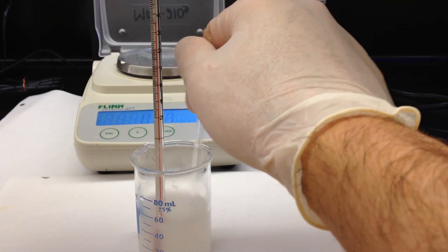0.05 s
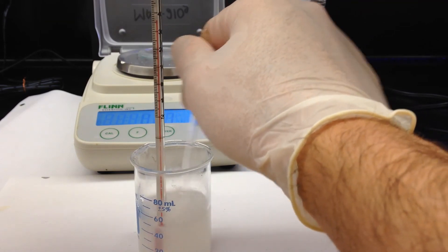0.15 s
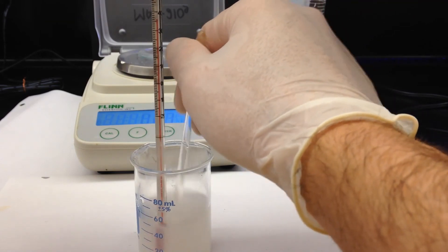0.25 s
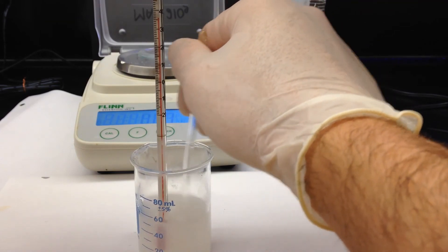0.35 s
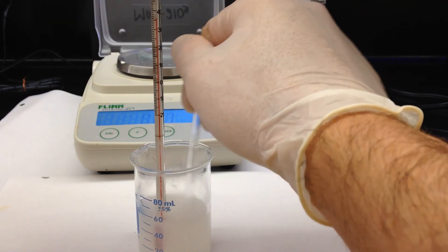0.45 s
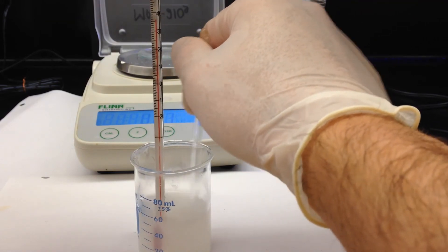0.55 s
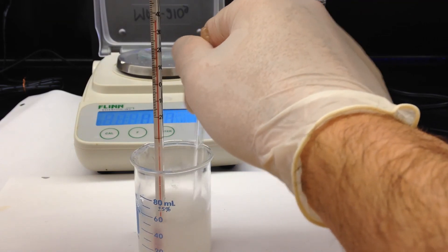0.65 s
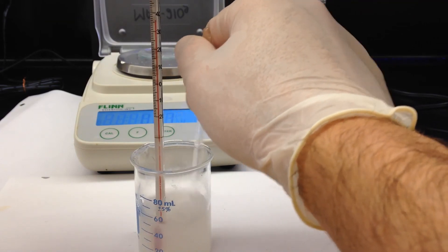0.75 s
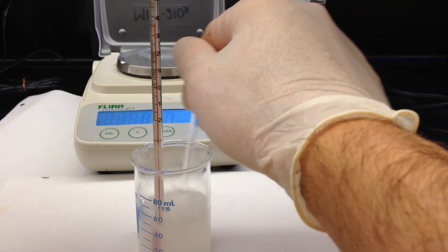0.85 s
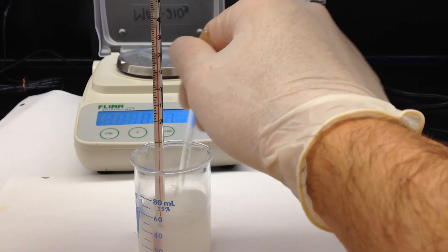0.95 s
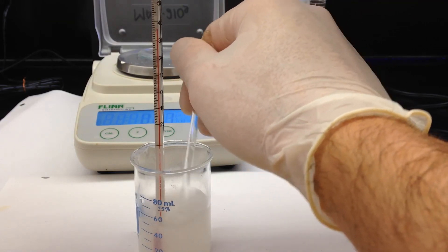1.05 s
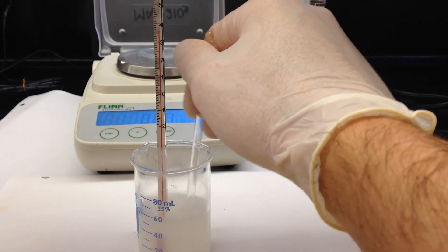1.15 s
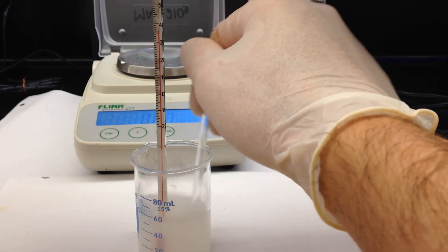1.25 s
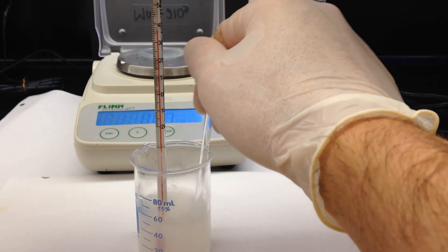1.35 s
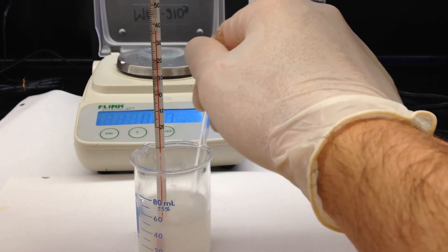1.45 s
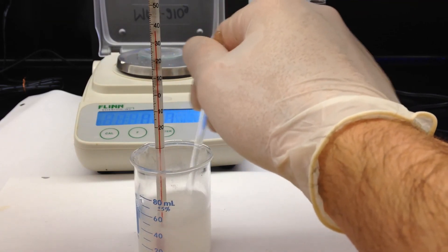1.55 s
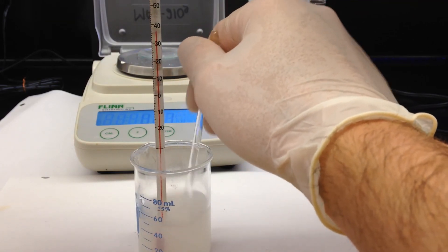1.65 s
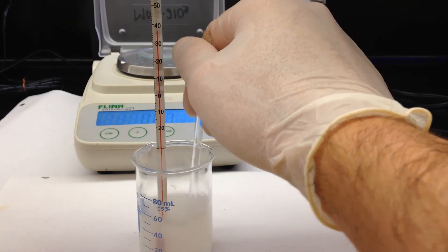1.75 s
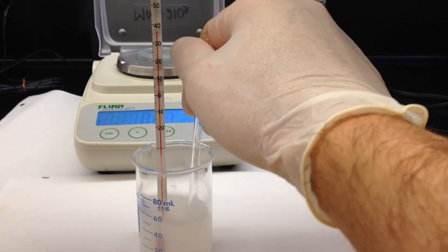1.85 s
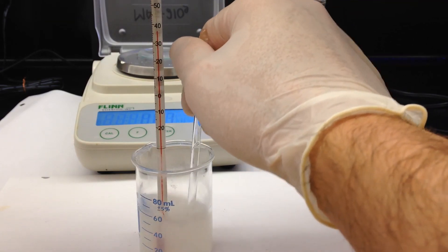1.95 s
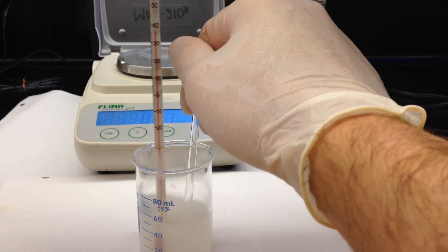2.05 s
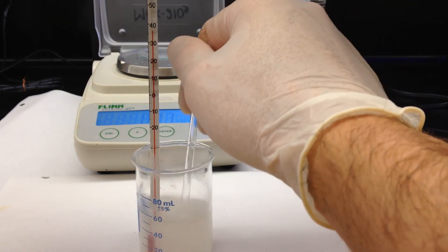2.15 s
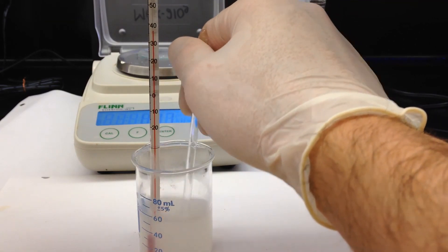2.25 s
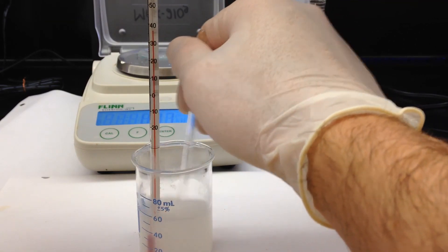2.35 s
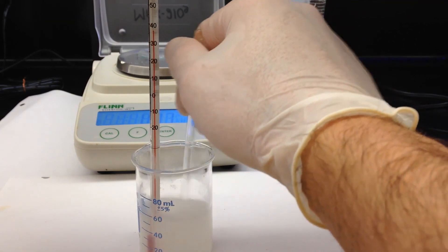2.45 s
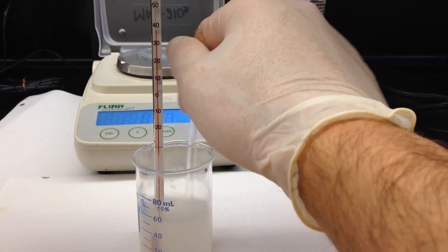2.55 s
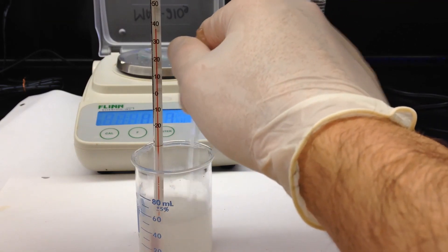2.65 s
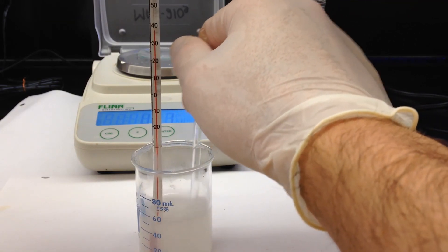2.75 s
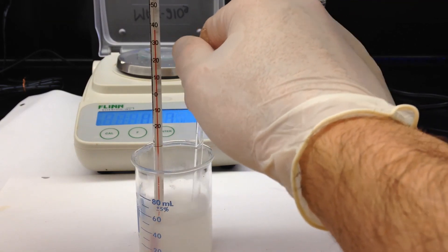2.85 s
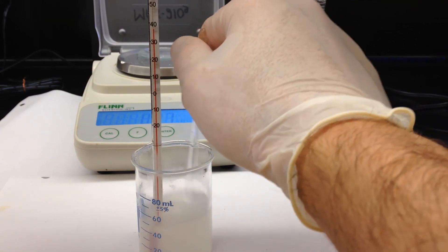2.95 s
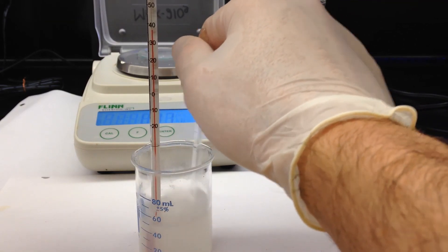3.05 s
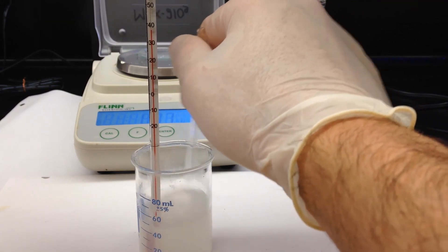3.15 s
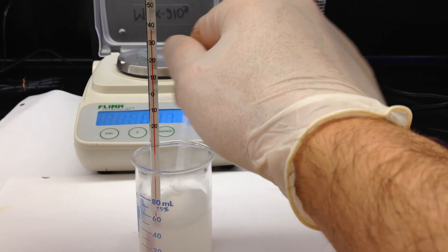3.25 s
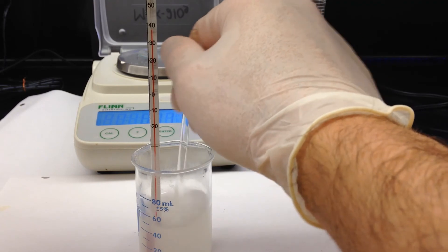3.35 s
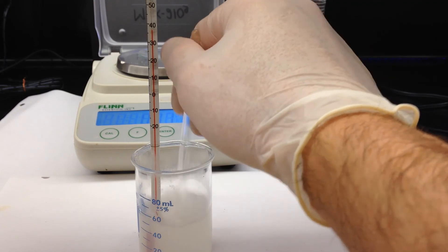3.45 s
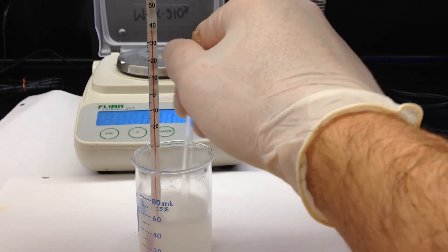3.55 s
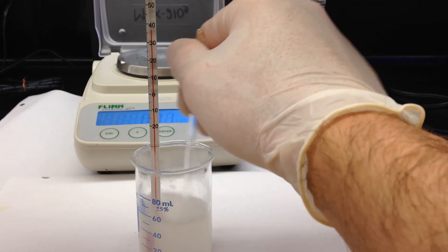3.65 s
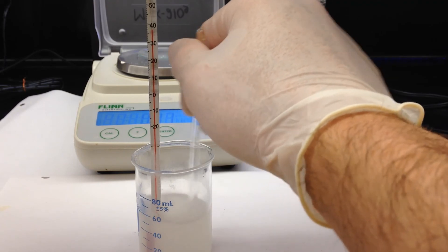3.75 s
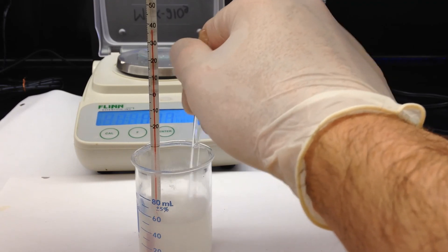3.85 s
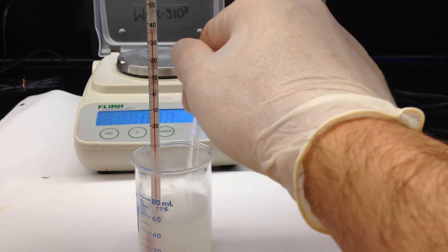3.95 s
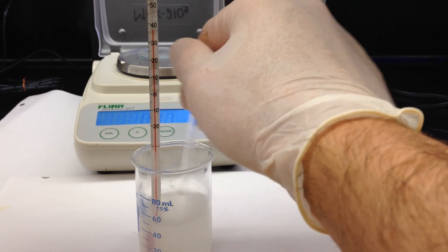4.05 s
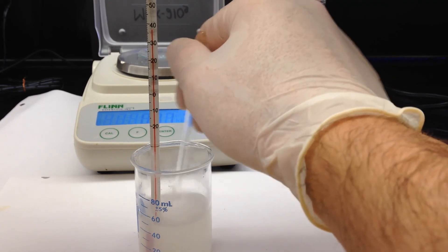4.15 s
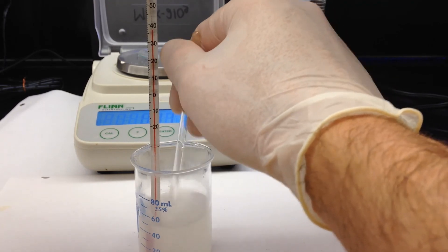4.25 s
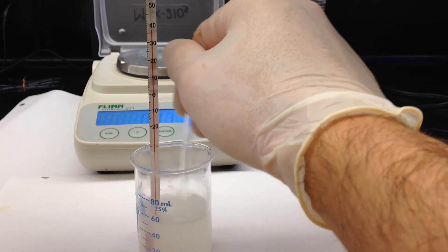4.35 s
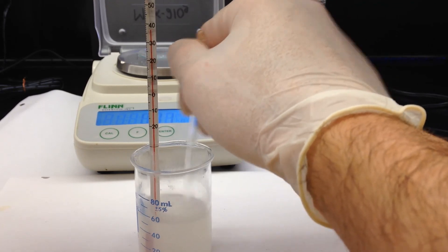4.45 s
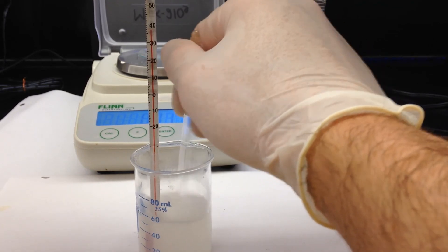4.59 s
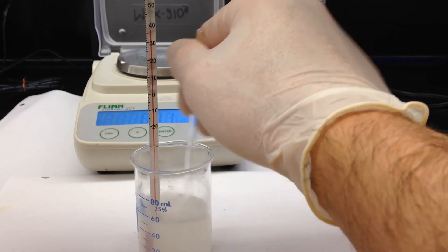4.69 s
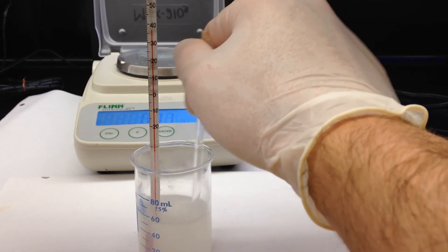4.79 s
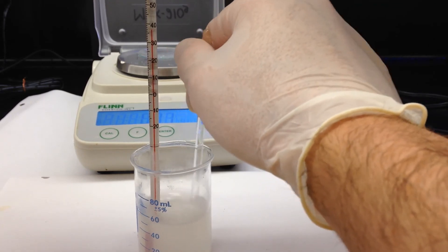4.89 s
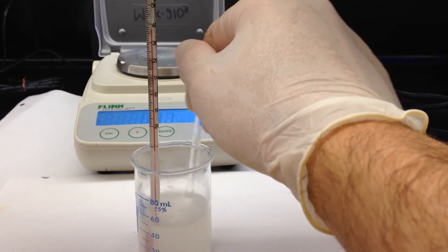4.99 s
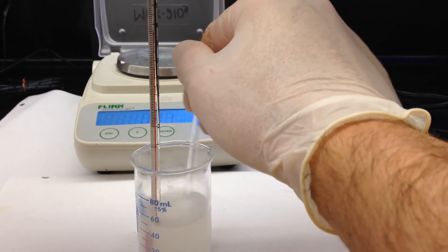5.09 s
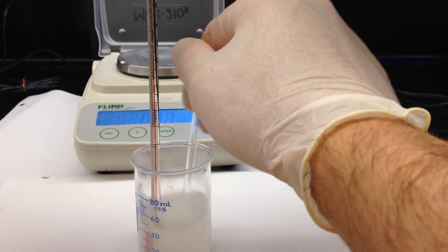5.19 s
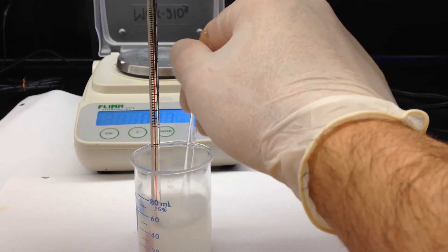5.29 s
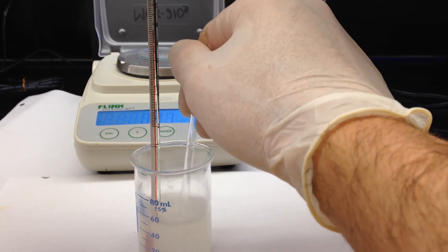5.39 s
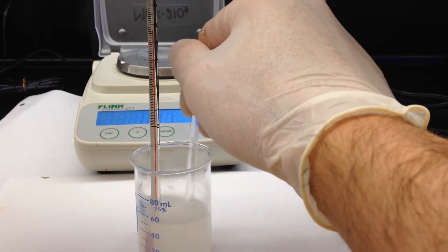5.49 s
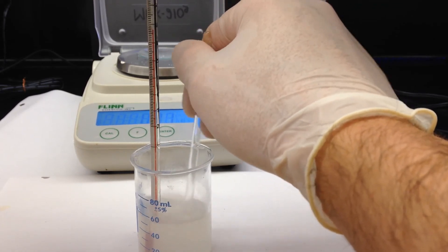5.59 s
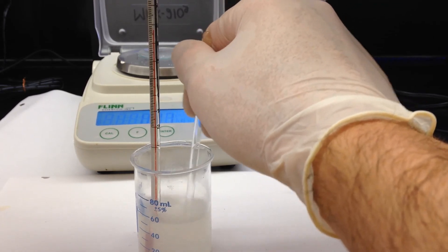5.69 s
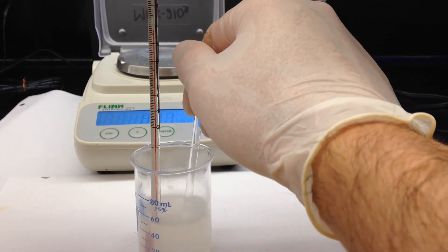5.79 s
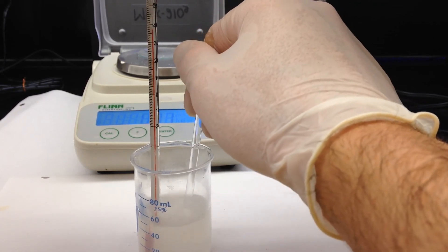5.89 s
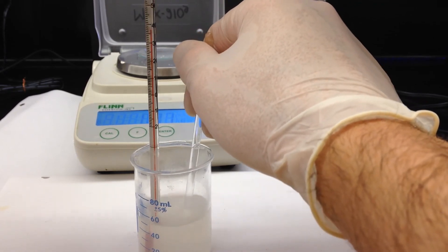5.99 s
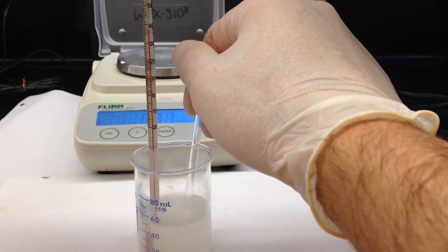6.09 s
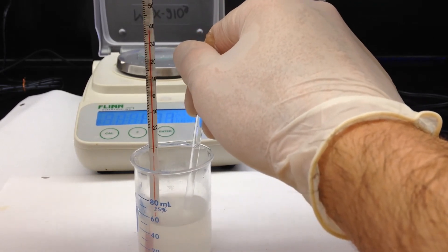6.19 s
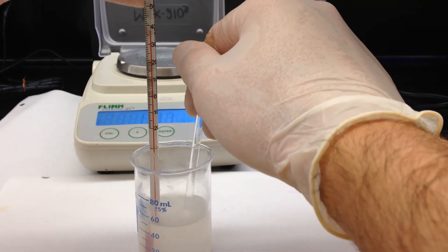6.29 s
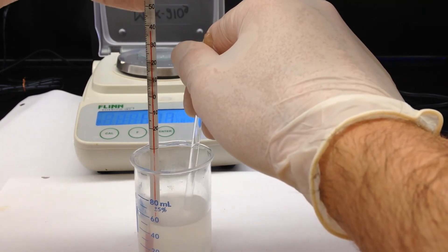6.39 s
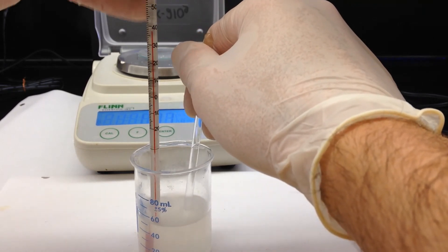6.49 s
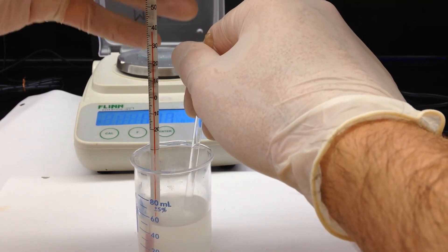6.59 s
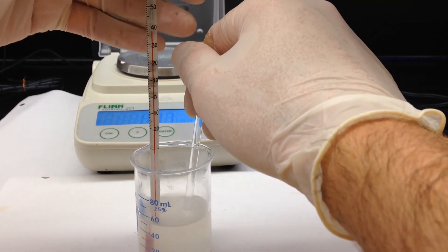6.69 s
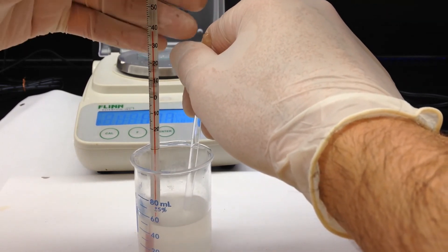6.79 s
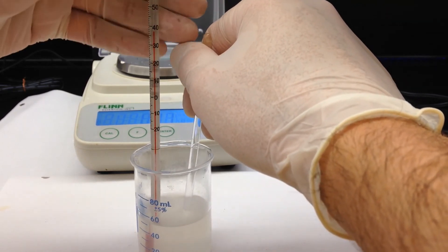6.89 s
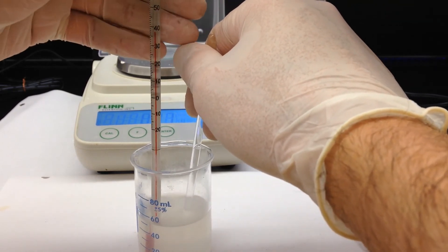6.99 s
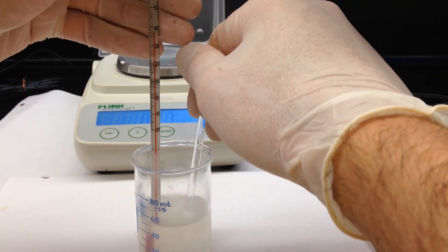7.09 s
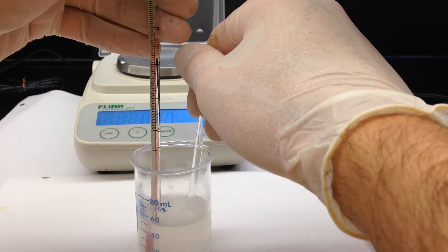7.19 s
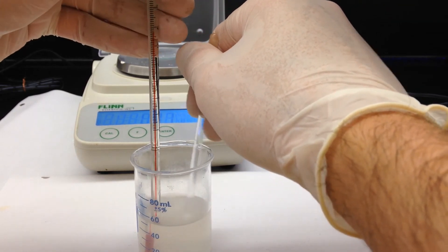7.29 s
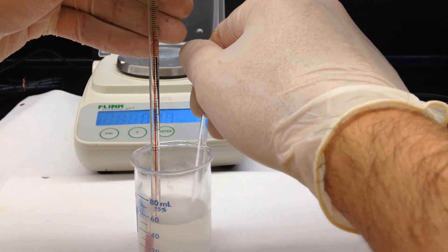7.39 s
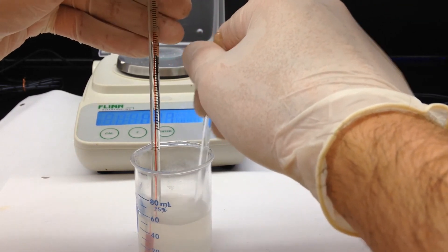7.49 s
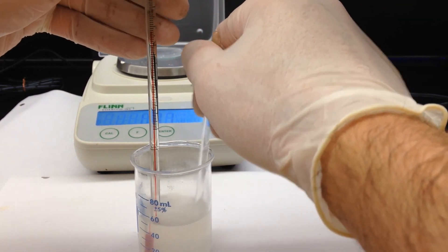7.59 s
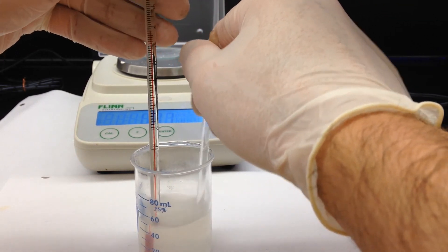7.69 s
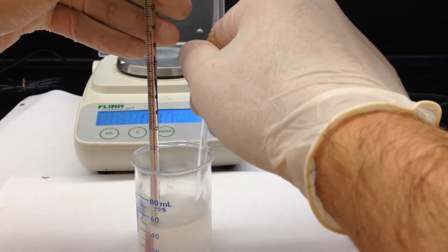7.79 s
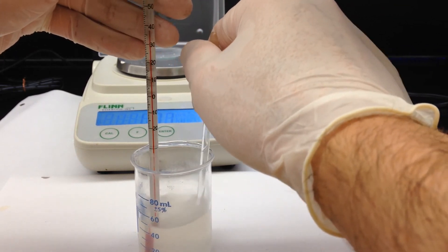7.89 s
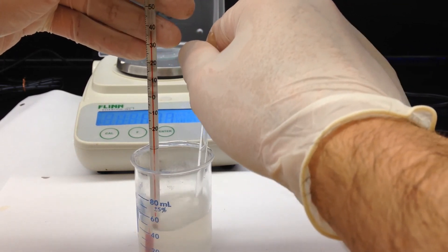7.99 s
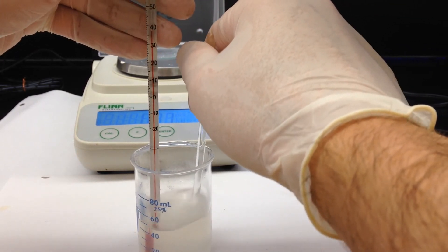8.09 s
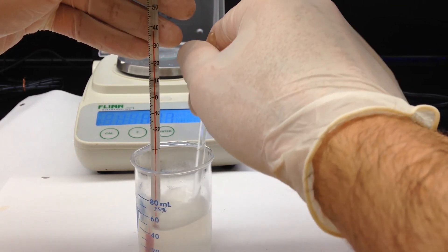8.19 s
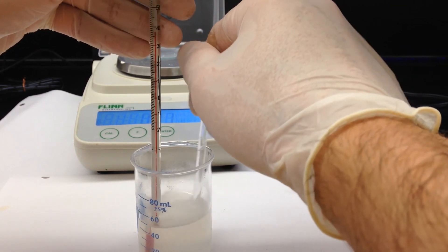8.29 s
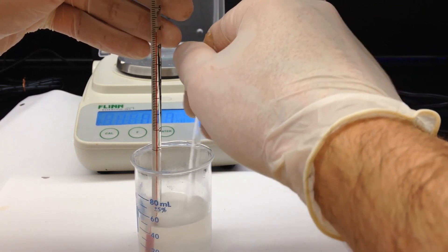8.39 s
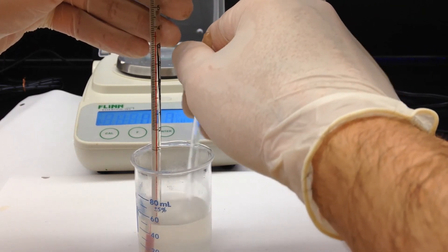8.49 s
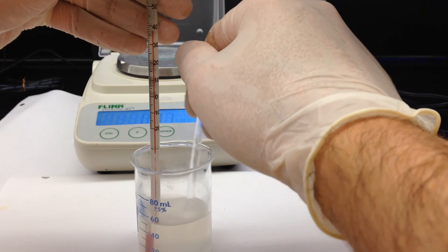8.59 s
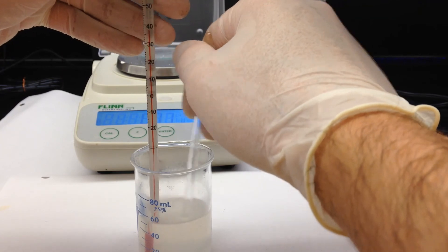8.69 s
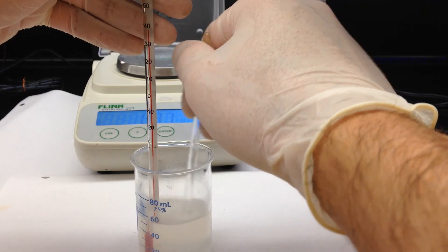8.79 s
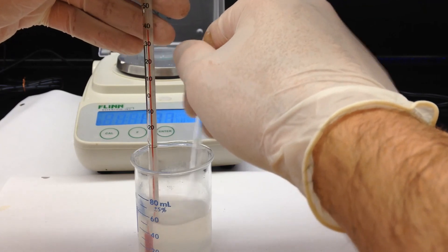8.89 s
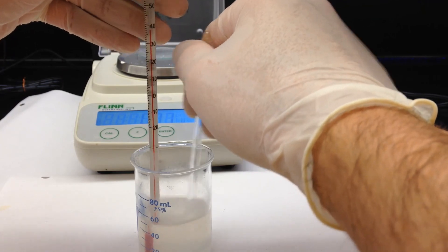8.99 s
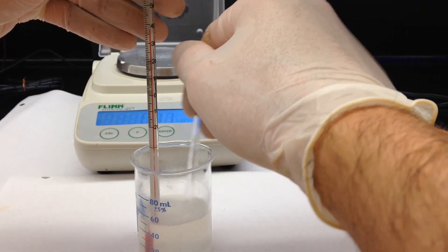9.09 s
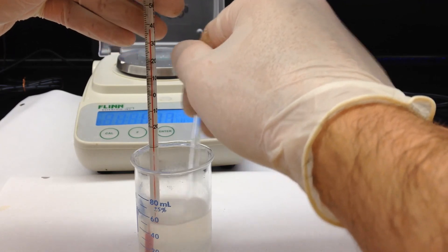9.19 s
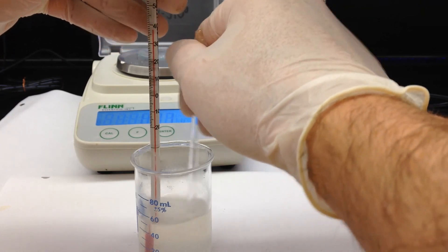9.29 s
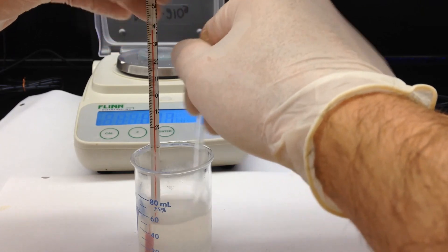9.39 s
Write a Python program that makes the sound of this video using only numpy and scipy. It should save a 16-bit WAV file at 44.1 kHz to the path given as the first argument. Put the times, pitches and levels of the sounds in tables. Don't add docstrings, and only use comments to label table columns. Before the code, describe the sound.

Close microphone in a small lab: a thin glass rod stirs liquid in a beaker, knocking the wall and a glass thermometer in quick, uneven, bright clinks with short wet squeaks. Around six seconds it nearly stops, leaving faint ticks and low ventilation rumble, then resumes at about ten taps per second with light bench thuds.

```python
import sys
import numpy as np
from scipy import signal
from scipy.fft import rfft, irfft, next_fast_len
from scipy.io import wavfile
from scipy.ndimage import uniform_filter1d

SR = 44100
rng = np.random.default_rng(int(sys.argv[2]) if len(sys.argv) > 2 else 0)


def dump(signal):
    limited = np.clip(np.atleast_2d(signal).T, -1, 1)
    pcm = np.round(limited * 32767).astype(np.int16)
    wavfile.write(sys.argv[1], SR, pcm)


def to_linear_factor(level_db):
    exponent = np.asarray(level_db, float) / 20
    return 10 ** exponent


N = 416304
STEADY_TOP_HZ = 15850
HELD_FROM_S = 7.0


def place(seconds, shapes):
    out = np.zeros(N + shapes.shape[1])
    starts = np.round(seconds * SR).astype(int)[:, None]
    np.add.at(out, starts + np.arange(shapes.shape[1]), shapes)
    return out[:N]


def bandpass(x, low_hz, high_hz, order=2):
    return signal.sosfilt(signal.butter(order, [low_hz, high_hz], "band", fs=SR, output="sos"), x)


def strike(seconds, blow_db, modes, scatter_db, detune, rise_s, lean_db=0, scramble=1):
    hz, db, t60 = np.transpose(modes)
    luck = rng.standard_normal((len(seconds), len(modes), 3))
    share = to_linear_factor(db + lean_db + scatter_db * luck[..., 0])
    share = share * np.sqrt(np.sum(to_linear_factor(db) ** 2) / np.sum(share ** 2, axis=1))[:, None]
    t = np.arange(int(t60.max() * SR)) / SR
    shapes = 0
    for k in range(len(modes)):
        turns = hz[k] * (1 + detune * luck[:, k, 1:2]) * t + scramble * luck[:, k, 2:]
        shapes = shapes + share[:, k:k + 1] * to_linear_factor(-60 * t / t60[k]) * np.sin(2 * np.pi * turns)
    return place(seconds, to_linear_factor(blow_db)[:, None] * shapes * (1 - np.exp(-t / rise_s)))


# (start t/s, end t/s, treble level/dB)
DROPOUTS = [(0.127, 0.143, -24), (0.303, 0.309, -16), (0.488, 0.502, -11), (1.643, 1.648, -13),
            (2.021, 2.039, -24), (2.662, 2.681, -28), (2.922, 2.946, -16), (3.341, 3.351, -22),
            (3.439, 3.445, -9), (4.008, 4.016, -8), (4.354, 4.361, -12), (4.709, 4.726, -21),
            (4.824, 4.83, -7), (5.199, 5.212, -12), (5.497, 5.508, -22), (5.747, 5.771, -27),
            (5.819, 5.84, -26), (6.059, 6.07, -13), (6.393, 6.413, -14), (6.609, 6.624, -14),
            (6.759, 6.776, -17), (7.376, 7.416, -24), (7.482, 7.502, -17), (7.979, 7.991, -13),
            (8.61, 8.623, -25), (9.258, 9.267, -11), (9.341, 9.353, -22)]


def treble_dropouts(x):
    t, size = np.arange(N) / SR, next_fast_len(N)
    edges = np.geomspace(1300, 17500, num=24)
    spared = rng.random((len(DROPOUTS), len(edges))) < np.where(edges < 5500, .2, .07)
    spectrum, hz, out = rfft(x, size), np.fft.rfftfreq(size, 1 / SR), x.copy()
    for k, (low, high) in enumerate(zip(edges, edges[1:])):
        band = irfft(spectrum * (hz >= low) * (hz < high), size)[0, :N]
        ringing = to_linear_factor(12) * np.median(np.abs(band[::50]))
        duck_db = np.zeros(N)
        for (start, end, db), stays in zip(DROPOUTS, spared[:, k]):
            near = slice(int((start - .003) * SR), int((end + .003) * SR))
            fade = np.clip(np.minimum(t[near] - start, end - t[near]) / .008 + .35, 0, 1)
            quiet = np.median(np.abs(band[near])) < ringing
            short_and_deep = end - start < .014 and db < -24
            if (quiet and not stays) or short_and_deep:
                duck_db[near] += 1.1 * db * fade
        out += (to_linear_factor(duck_db) - 1) * band
    return out


# (t/s, length t/s, low f/Hz, high f/Hz, level/dB)
SMEARS = [(.318, .026, 5000, 15800, -53), (2.917, .03, 3000, 3350, -56), (2.917, .03, 3950, 4200, -57),
          (2.917, .034, 4500, 4750, -56), (2.917, .03, 8000, 8300, -54), (2.917, .03, 8550, 8800, -55),
          (2.917, .028, 9100, 9350, -56), (2.917, .028, 10600, 10900, -58), (4.326, .03, 8000, 12500, -49),
          (4.348, .026, 6900, 7150, -53), (4.35, .022, 3200, 3450, -53), (4.335, .025, 4600, 4900, -53),
          (5.752, .02, 4300, 5400, -57), (.122, .024, 6900, 7200, -61), (4.35, .022, 2400, 2650, -58)]


def smears():
    out = np.zeros(N)
    for s, length_s, low_hz, high_hz, db in SMEARS:
        noise = bandpass(rng.standard_normal(4096), low_hz, high_hz, order=4)[-int(length_s * SR):]
        fade = np.cos(np.linspace(0, np.pi / 2, len(noise))) ** .7
        out[int(s * SR):][:len(noise)] += to_linear_factor(db) * noise / noise.std() * fade
    return out


# (f/Hz, level/dB per Hz)
AIR = [(20, -43.5), (40, -33), (80, -12.5), (105, -0.5), (230, -6), (478, -2), (505, -9), (800, -12.5),
       (1500, -20.5), (2400, -27), (12500, -32), (15800, -34.5)]
# (f/Hz, rms level/dB, wobble f/Hz)
HUM = [
    (54.2, -78, 1.2),
    (113.5, -71, 8),
    (157, -71, 9),
    (228.8, -67, 15),
    (2136, -88, 2.9),
]


def ventilation():
    hz = np.fft.rfftfreq(N, 1 / SR) + 1e-3
    air_hz, air_db = np.transpose(AIR)
    colour = to_linear_factor(np.interp(np.log(hz), np.log(air_hz), air_db)) * (hz < STEADY_TOP_HZ)
    air = irfft(rfft(rng.standard_normal(N)) * colour, N)
    gusts = uniform_filter1d(rng.standard_normal(N), size=3000) * 55
    out = to_linear_factor(-59.5 + 1.3 * gusts) * air / air.std()
    for tone_hz, db, wobble_hz in HUM:
        tone = irfft(rfft(rng.standard_normal(N)) / (1 + ((hz - tone_hz) / wobble_hz) ** 2), N)
        out = out + to_linear_factor(db) * tone / tone.std()
    return out


def room(x):
    t = np.arange(SR // 2) / SR
    early, late = rng.standard_normal((2, len(t))) * (t > .0015)
    late = signal.sosfilt(signal.butter(1, 5000, fs=SR, output="sos"), late)
    echo = early * to_linear_factor(-24.0 - 60 * t / 0.021) + late * to_linear_factor(-45.5 - 60 * t / 0.36)
    echo = signal.sosfilt(signal.cheby2(10, 50, STEADY_TOP_HZ, fs=SR, output="sos"), echo)
    return signal.fftconvolve(x, echo)[:N]


# (t/s, peak level/dB)
THUDS = [(1.762, -43), (2.211, -44), (7.448, -43), (7.536, -41), (7.769, -45), (5.74, -47), (4.535, -44),
         (8.53, -51), (8.63, -51), (7.95, -50), (9.125, -55), (1.5, -50), (7.645, -48), (8.35, -47)]
# (f/Hz, level/dB, t60 t/s)
THUD_MODES = [(570, -5.5, 0.06), (684, -7.5, 0.042), (810, -3.5, 0.054), (926, -2, 0.037),
              (1040, -14, 0.017), (1280, -9, .03)]


def bench_thuds():
    s, db = np.transpose(THUDS)
    return strike(s, db, THUD_MODES, scatter_db=5.0, detune=0.046, rise_s=0.0028)


# (f/Hz, level/dB, t60 t/s)
BENCH_MODES = [(663, -21.5, 0.017), (873, -26, 0.037), (1126, -42, 0.016), (1308, -21, 0.036),
               (1530, -35.5, 0.021)]


def bench_shake(s, wall_db, rod_db, held):
    db = np.clip(rod_db, wall_db, wall_db + 14.0) + np.where(held, 5.0, -3.0)
    t = np.arange(1024) / SR
    shudder = rng.standard_normal((len(s), len(t))) * (1 - np.exp(-t / 0.002)) * np.exp(-t / 0.012)
    out = place(s, to_linear_factor(db - 18.5)[:, None] * bandpass(shudder, 550, 1500))
    return out + strike(s, db, BENCH_MODES, scatter_db=-0.5, detune=0.038, rise_s=0.0016)


# (t/s, swell t/s, slip rate f/Hz, level/dB of multiple 1, level/dB of multiple 2)
SQUEAKS = [(1.336, 0.0014, 5280, -34, -40), (1.434, .004, 4980, -42.5, -44.5),
           (1.441, .004, 4800, -39.5, -44), (1.45, 0.0039, 5220, -44, -54), (1.677, 0.0057, 4756, -27, -33),
           (1.341, .003, 5500, -41, -59), (4.167, 0.0027, 5030, -35.5, -42),
           (2.837, 0.0037, 5170, -38, -47), (3.82, 0.0053, 5130, -40.5, -62),
           (3.956, 0.01, 5450, -35.5, -39), (4.057, 0.0026, 4980, -36.5, -54),
           (4.171, 0.0085, 5010, -29, -30), (4.302, .004, 5300, -43, -48), (4.361, 0.0045, 4800, -37, -49),
           (4.414, 0.0079, 5220, -33, -40.5), (4.769, 0.0012, 5190, -33, -37),
           (4.879, 0.0039, 5250, -31.5, -40.5), (5.332, .002, 5500, -48, -70),
           (3.853, .002, 5300, -52, -70), (5.769, 0.0031, 4900, -44.5, -83),
           (8.283, 0.003, 5130, -45.5, -54), (8.864, 0.0013, 5160, -36.5, -50),
           (9.172, 0.0033, 5040, -41, -46), (9.268, 0.0078, 5030, -39, -39.5)]


def squeaks():
    s, swell_s, hz, first_db, second_db = np.transpose(SQUEAKS)[..., None]
    t = np.arange(6144) / SR
    after = np.maximum(t - swell_s, 0)
    release = np.exp(-(after / .0024) ** 1.3)
    ring = np.clip(2500 * swell_s ** 2, .08, .25) * np.exp(-after / (.004 + 1.2 * swell_s))
    tail = 5.5 * swell_s * np.exp(-after / 0.045)
    grip = np.minimum(t / swell_s, 1) ** .55 * (release + ring + tail)
    uneven = uniform_filter1d(rng.standard_normal((len(s), len(t))), size=260) * 16
    uneven = uniform_filter1d(uneven, size=120)
    grit = uniform_filter1d(rng.standard_normal(uneven.shape), size=40) * 6.3
    grit = grit * np.clip(after / .003, .6, 1) * np.exp(-after / 0.0144)
    glide = np.tanh((t - swell_s) / 0.009)
    pitch_hz = hz * (1 + 0.019 * grit + 0.0045 * uneven + 0.012 * glide)
    turns = 2 * np.pi * np.cumsum(pitch_hz, axis=1) / SR
    tones = 0
    for k, db in enumerate((first_db, second_db, second_db - 18)):
        tones = tones + to_linear_factor(db) * grip ** (1 + .15 * k) * np.sin((k + 1) * turns)
    scrape = bandpass(rng.standard_normal(uneven.shape), 4200, 5900)
    tones = tones + to_linear_factor(first_db - 12.0) * grip ** 0.8 * scrape
    return place(s[:, 0], tones * (1 + .2 * np.roll(uneven, 1, axis=0)))


# (f/Hz, level/dB, t60 t/s)
RING_MODES = [(4440, 0, 0.06), (4575, -0.5, 0.094)]
HELD_RING_MODES = [(4615, 0, .07), (4495, -4, .06)]


def thermometer(s, ring_db, held, light_s, light_rod_db):
    out = strike(light_s, light_rod_db - 23, RING_MODES, scatter_db=3, detune=.003, rise_s=.003)
    out = out + strike(s[~held], ring_db[~held] + 2.5, RING_MODES, scatter_db=4.0, detune=.007, rise_s=.003)
    return out + strike(s[held], ring_db[held] + 5.0, HELD_RING_MODES, scatter_db=3.0, detune=0.003,
                        rise_s=0.0054)


# (f/Hz, level/dB, t60 t/s)
RIM_MODES = [(4652, -5.5, 0.017), (5220, -1, 0.0038)]


def rim(s, ring_db):
    return strike(s, ring_db + 19.0, RIM_MODES, scatter_db=4.0, detune=0.025, rise_s=0.001)


# (f/Hz, level/dB, t60 t/s)
WALL_MODES = [(3036, -5.5, 0.022), (3418, -2, 0.014), (2540, -21, 0.0085), (3970, -5, 0.026),
              (2035, -22, 0.0058)]
HELD_WALL_MODES = [(3080, -19, 0.022), (3420, -6, 0.011), (2660, -23, 0.026), (4000, -8, 0.012)]


def wall(s, wall_hz, wall_db, held):
    octaves = np.log2(np.array(WALL_MODES)[:, 0] / wall_hz[:, None])
    lean_db = np.maximum(-60 * octaves ** 2, -6)
    out = strike(s[~held], wall_db[~held] - 3.5, WALL_MODES, scatter_db=2.0, detune=.02, rise_s=0.00069,
                 lean_db=lean_db[~held], scramble=0.066)
    out = out + strike(s[held], wall_db[held] - 2.0, HELD_WALL_MODES, scatter_db=2.0, detune=0.022,
                       rise_s=0.00034, scramble=0.073)
    t = np.arange(1024) / SR
    rattle = rng.standard_normal((len(s), len(t))) * (1 - np.exp(-t / 0.00048)) * np.exp(-t / 0.0066)
    rattle_db = wall_db + np.where(held, -11.0, -5.0)
    return out + place(s, to_linear_factor(rattle_db)[:, None] * bandpass(rattle, 2900, 4800))


# (f/Hz, level/dB, t60 t/s)
CLICK_MODES = [(hz, -9.5, .0055) for hz in np.geomspace(11000, 16400, num=10)]


def tip_clicks(s, rod_db, click_db):
    hardness = np.clip(click_db - rod_db + 2, -5, 8)[:, None]
    lean_db = 3 * hardness * np.log2(np.array(CLICK_MODES)[:, 0] / 13000)
    return strike(s, click_db + 2.5, CLICK_MODES, scatter_db=3.0, detune=.04, rise_s=.0002, lean_db=lean_db)


# (f/Hz, level/dB, t60 t/s)
ROD_MODES = [(hz, -11, .0065) for hz in np.geomspace(5600, 10600, num=14)]
# (t/s, f/Hz)
ROD_PITCH = [(0, 6640), (.5, 6900), (1, 7860), (1.45, 6860), (2.3, 7900), (3.2, 9400), (3.9, 7900),
             (4.4, 10200), (5.4, 9600), (5.7, 7260), (7.55, 6950), (7.75, 9700), (8.4, 9350), (9.4, 9350)]


def rod(s, rod_db):
    loudest_hz = np.interp(s, *np.transpose(ROD_PITCH))[:, None]
    octaves = np.log2(np.array(ROD_MODES)[:, 0] / loudest_hz)
    lean_db = np.maximum(-76.5 * octaves ** 2, -7)
    return strike(s, rod_db + 2.5, ROD_MODES, scatter_db=3.5, detune=.03, rise_s=.0001, lean_db=lean_db)


def knocks(s, wall_hz, wall_db, rod_db, click_db):
    t = np.arange(1024) / SR
    lasts_s = 0.0025 * np.clip(3500 / wall_hz, 0, 1)[:, None] ** 1.8
    swell = (1 - np.exp(-t / .0004)) * np.exp(-(t / lasts_s) ** 3)
    knock = to_linear_factor(wall_db + 1.5)[:, None] * swell * np.sin(2 * np.pi * wall_hz[:, None] * t)
    crack = rng.standard_normal((len(s), len(t))) * (np.exp(-t / 0.003) + 0.1 * np.exp(-t / 0.0192))
    crack = signal.lfilter([.3], [1, -.7], crack)
    crack = crack - 0.47 * signal.sosfilt(signal.butter(2, 2700, fs=SR, output="sos"), crack)
    crack_db = np.minimum(np.minimum(rod_db, wall_db + 10), click_db + 19.5) - 10.0
    return place(s, knock + crack * to_linear_factor(crack_db)[:, None])


def landings(tables, pitches_hz):
    rows = [np.insert(np.array(table, float), 1, hz, axis=1) for table, hz in zip(tables, pitches_hz)]
    rows = np.vstack(rows)
    rows[:, 1] *= 1 + 0.023 * rng.standard_normal(len(rows))
    return rows


# (t/s, level/dB)
LIGHT_CLICK = [(0, 1), (.7, -4), (1.5, 6), (2.3, -4), (3.8, -10), (4.3, 8), (4.7, -4), (5.3, -12), (5.9, -13),
               (7.5, 6), (8.2, -6), (9.4, -3)]


def unrung(table, click_db):
    s, wall_db, rod_db = np.transpose(table)
    click_db = click_db + np.interp(s, *np.transpose(LIGHT_CLICK)) + 3 * rng.standard_normal(len(s))
    return np.c_[s, wall_db, np.full(len(s), -90), rod_db, rod_db + click_db]


SHARP_TAPS = [(0.0529, -22.5, -54, -27.5, -31), (0.1717, -25.5, -44.5, -30.5, -30),
              (0.3168, -37, -45.5, -30, -17.5), (0.984, -23, -48, -24.5, -28),
              (2.014, -34.5, -46.5, -36.5, -41), (2.3619, -32, -44.5, -25, -31),
              (2.576, -39, -51, -28, -38), (3.1734, -34.5, -46.5, -27, -37.5),
              (3.3978, -39, -48, -48.5, -31), (3.5091, -29.5, -44, -31, -34.5),
              (3.6743, -38.5, -55, -30.5, -34), (4.3238, -41.5, -59, -21, -18),
              (4.531, -19.5, -38, -26, -28.5), (4.5915, -25.5, -45, -31.5, -38),
              (4.6994, -33, -48, -30.5, -36), (5.3949, -33.5, -49.5, -29, -37),
              (5.5135, -36.5, -53.5, -29.5, -41), (5.8488, -40, -50.5, -28.5, -37)]
DULL_TAPS = [(0.0777, -35.5, -53, -39, -64), (0.195, -32, -59, -45, -52), (0.2928, -25, -49, -33, -30),
             (0.587, -39, -64, -35.5, -63), (0.4265, -36, -52.5, -39, -49), (0.761, -32, -49, -30, -56),
             (0.884, -39.5, -59, -45, -56), (0.9179, -38, -62, -32.5, -56), (1.3922, -42, -59, -35.5, -58),
             (1.476, -46, -57, -34.5, -46), (1.5205, -41, -65, -38, -58),
             (1.633, -34.5, -45.5, -27.5, -51.5), (1.749, -43, -60, -37, -46), (1.9581, -41, -53, -35, -51),
             (2.5233, -35, -56, -34, -45), (2.6852, -37.5, -52, -32, -45), (2.833, -39.5, -53, -41, -53),
             (2.9153, -42, -59, -31.5, -59), (3.0065, -41.5, -51, -37, -41),
             (3.1142, -39.5, -51.5, -34, -47), (3.3558, -34, -48, -35, -46),
             (3.7316, -34.5, -44, -31.5, -41), (3.786, -36.5, -53, -35.5, -49), (3.903, -38, -60, -37, -50),
             (4.8182, -33, -52, -40.5, -51), (4.9504, -41, -58, -31, -42), (4.9961, -33, -48.5, -38, -47),
             (5.0508, -33.5, -55, -31, -41), (5.218, -33, -47, -36.5, -47), (5.29, -33.5, -56, -29, -42),
             (5.6304, -41.5, -53, -37.5, -53)]
SLANT_TAPS = [(0.5496, -32.5, -52, -27.5, -36), (0.6393, -29, -41, -31.5, -37),
              (0.7928, -40, -60, -31, -39), (0.8628, -28, -41.5, -33, -33), (1.1136, -36.5, -63, -41, -57),
              (1.2154, -27, -50, -34.5, -42), (1.2814, -39.5, -71, -31.5, -49),
              (1.3335, -28, -48, -35.5, -39), (1.6797, -42, -40, -46, -59),
              (1.6935, -31.5, -55.5, -37, -41), (2.2055, -34.5, -59, -37, -48),
              (2.4364, -40, -55, -29, -37.5), (4.413, -31.5, -53, -33, -38),
              (4.766, -28.5, -37, -24.5, -32), (5.737, -39, -53, -29.5, -32)]
GLANCES = [(1.854, -36.5, -48.5, -29, -47.5), (2.0702, -33, -68, -27.5, -35.5),
           (2.1642, -33, -50, -27, -43), (2.2648, -30.5, -52, -27.5, -51.5), (3.5784, -35, -49, -28.5, -38),
           (3.954, -32, -47, -35.5, -44), (4.023, -45, -62, -33.5, -43), (4.2912, -34.5, -42, -37, -47),
           (7.333, -39, -63, -34.5, -46)]
RIM_GLANCES = [(1.4198, -38, -46.5, -39, -30), (1.6533, -34, -48, -34, -25),
               (1.7589, -31.5, -46, -29, -21.5), (3.2767, -30.5, -40, -31.5, -36),
               (7.5289, -28, -41, -27, -26)]
HELD_TAPS = [(7.5627, -40.5, -56, -31.5, -31), (7.6388, -29, -45, -27, -32), (7.66, -39, -53, -35, -31),
             (7.742, -30, -42, -29, -34), (7.8526, -38.5, -52, -29, -37), (7.9478, -30, -40.5, -30.5, -31),
             (8.0475, -29.5, -44, -33, -36), (8.147, -33.5, -60, -42, -44), (8.2514, -29, -44, -28, -33),
             (8.3469, -25.5, -42, -24.5, -30), (8.4283, -31, -56, -30.5, -28), (8.5281, -27, -47, -26, -29),
             (8.6282, -27, -50, -28, -29), (8.7281, -33, -51, -31.5, -42), (8.8232, -32, -58, -33, -36),
             (8.9396, -33.5, -46.5, -30.5, -36), (9.022, -29.5, -52, -29, -28), (9.085, -42, -61, -41, -44),
             (9.1215, -28.5, -52, -29, -30), (9.22, -29, -52, -29.5, -31),
             (9.333, -32.5, -44.5, -29.5, -31)]
FIRM_TAPS = SHARP_TAPS, DULL_TAPS, SLANT_TAPS, GLANCES, RIM_GLANCES, HELD_TAPS
FIRM_HZ = [3460, 3345, 3840, 4200, 4190, 3294]
# (t/s, wall level/dB, rod level/dB)
BOUNCES = [(0.093, -47, -41), (.121, -45, -52), (.3535, -46, -42), (.4685, -49, -41.5), (.659, -48, -42),
           (.072, -46, -51), (3.061, -57.5, -67), (5.65, -50.5, -55), (7.765, -56, -59.5),
           (1.908, -47, -55), (.6866, -46, -33), (1.1607, -46, -37), (1.242, -44, -41),
           (1.3598, -38.5, -48), (1.8001, -38.5, -40.5), (1.9292, -48.5, -51), (2.4932, -43, -47),
           (2.7478, -48, -43), (2.7676, -41, -53), (3.6, -45, -53), (3.7, -47, -35.5), (3.3, -39, -40),
           (3.972, -43, -54), (4.5, -51, -48), (3.826, -51, -55), (3.594, -56, -56), (3.998, -53, -60),
           (4.3626, -42.5, -35), (4.4764, -39.5, -49), (5.1, -46, -43), (4.2, -52, -58), (4.581, -49, -60),
           (4.3, -47, -49), (4.809, -43, -49), (4.901, -47, -35.5), (5.164, -42, -39), (5.4647, -50, -49),
           (8.1106, -46, -58.5), (8.749, -43, -53), (8.359, -49, -62), (8.54, -50, -62), (8.568, -51, -62),
           (8.64, -57, -66), (8.962, -49, -64), (9.034, -53, -62), (9.1, -52, -62), (.235, -54, -66),
           (2.5, -52, -53), (2.6, -50, -60), (5.027, -52, -60), (2.548, -52, -56), (4.9, -42, -56),
           (5.681, -45.5, -46), (1.8265, -45, -54), (.183, -42, -60), (.063, -42, -60.5), (0.34, -42, -60),
           (4.31, -45, -57), (8.9793, -47.5, -50)]
SKIPS = [(1.7113, -41, -51.5), (1.673, -37.5, -38), (1.985, -56, -50), (4.1455, -53, -45),
         (5.1293, -45, -44), (5.7, -36, -52), (2.309, -47, -58), (2.08, -48, -58), (5.425, -48, -60),
         (3.768, -52, -62), (8.453, -43, -61), (8.554, -43, -58), (8.66, -52, -62), (8.462, -55, -62),
         (9.151, -48, -62), (8.991, -53, -62), (8.651, -46, -66), (8.8485, -46, -54)]
TICKS = [(0.0296, -50, -38), (0.148, -59, -42), (0.2722, -57, -40.5), (3.378, -65, -44), (3.385, -65, -45),
         (3.9607, -60, -62), (4.372, -55, -54), (6.046, -76, -56), (6.298, -64, -56), (6.333, -64, -57),
         (6.5587, -64, -56), (7.2825, -60, -70)]


def contacts():
    light = [unrung(BOUNCES, -11), unrung(SKIPS, -12), unrung(TICKS, 10)]
    hits = np.vstack([landings(FIRM_TAPS, FIRM_HZ), landings(light, [3380, 3950, 3450])])
    luck = rng.random((len(hits), 2, 2))
    weaker_db = np.array([-20.5, -40, -20.5, -21])
    rows = [hits]
    for k in range(2):
        s = hits[:, 0] + .005 + .03 * luck[:, k, 0]
        wall_hz = hits[:, 1] * (.9 + .2 * luck[:, k, 1])
        levels_db = hits[:, 2:] + weaker_db - 8.0 * luck[:, k].sum(axis=1, keepdims=True)
        rows.append(np.c_[s, wall_hz, levels_db])
    return np.vstack(rows).T


def taps():
    s, wall_hz, wall_db, ring_db, rod_db, click_db = contacts()
    s = s + .0003
    out = knocks(s, wall_hz, wall_db, rod_db, click_db) + rod(s, rod_db) + tip_clicks(s, rod_db, click_db)
    firm = slice(sum(map(len, FIRM_TAPS)))
    light = slice(firm.stop, len(s) // 3)
    held = s[firm] > HELD_FROM_S
    out = out + wall(s[firm], wall_hz[firm], wall_db[firm], held)
    out = out + thermometer(s[firm], ring_db[firm], held, s[light], rod_db[light])
    out = out + rim(s[firm], ring_db[firm])
    return out + bench_shake(s[firm], wall_db[firm], rod_db[firm], held) + bench_thuds()


def scene():
    glass, whistles = taps(), squeaks()
    return (glass + whistles + room(glass + .45 * whistles) + ventilation())[None]


def band_limit(x):
    return signal.sosfilt(signal.butter(12, 17000, fs=SR, output="sos"), x)


def record(dry):
    mix = treble_dropouts(dry) + smears()
    mix = signal.sosfilt(signal.cheby2(10, 60, 17200, fs=SR, output="sos"), mix)
    return band_limit(mix)


dry = scene()
out = record(dry)
dump(out)
```